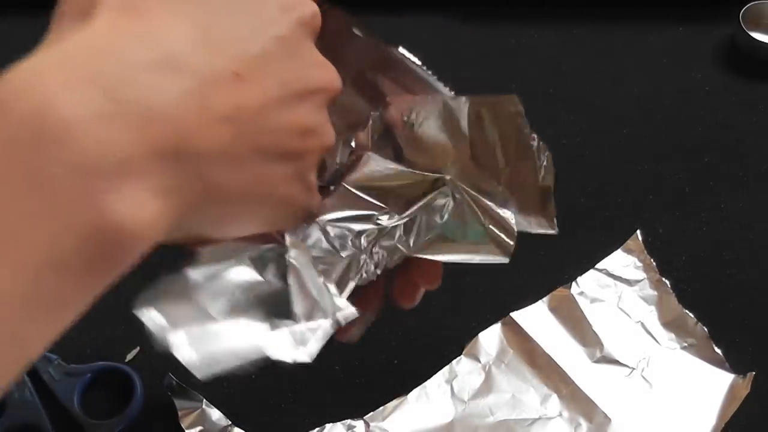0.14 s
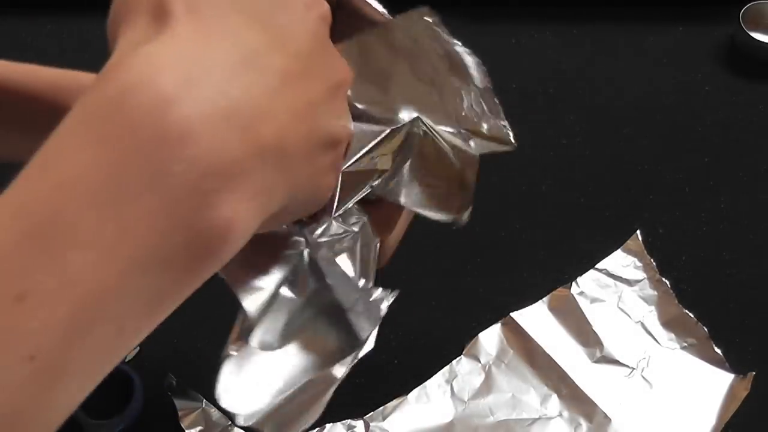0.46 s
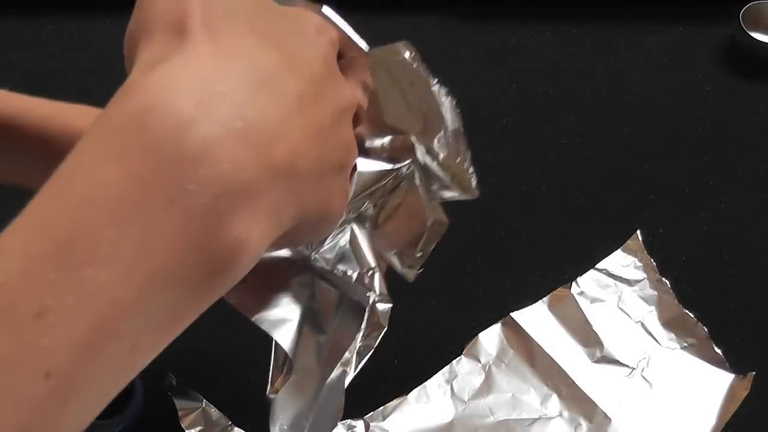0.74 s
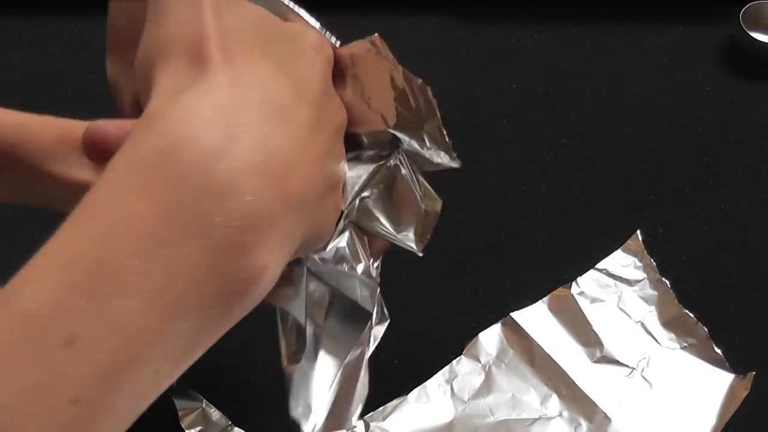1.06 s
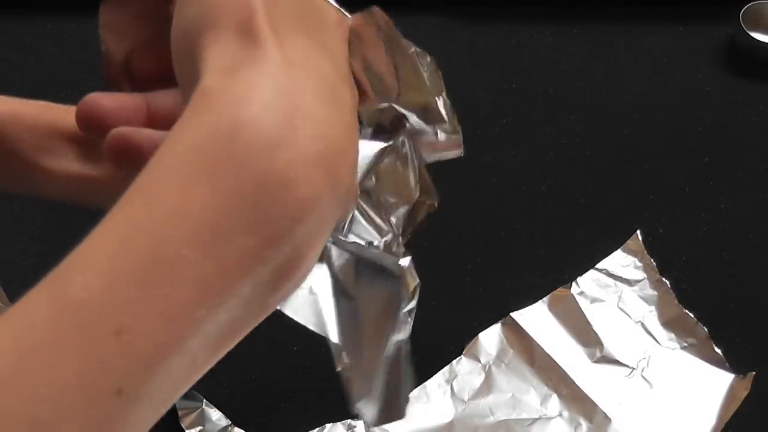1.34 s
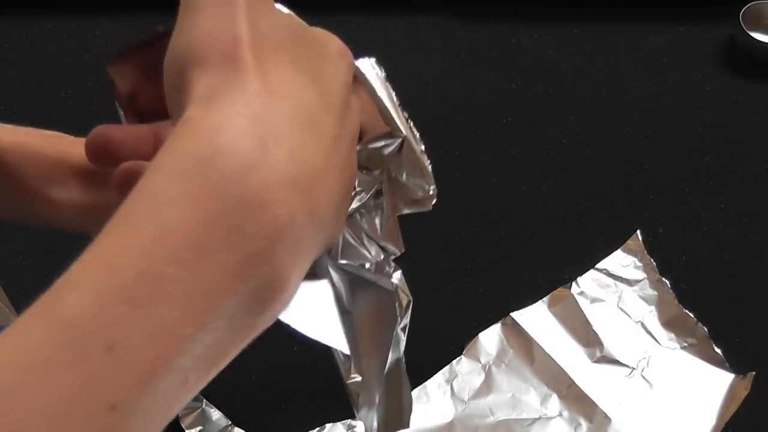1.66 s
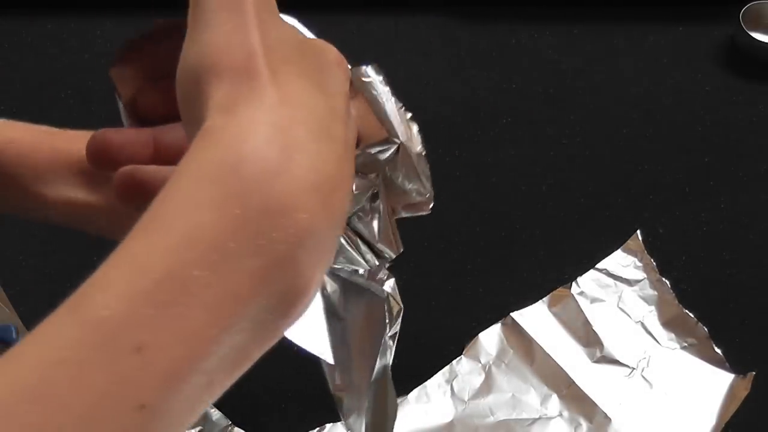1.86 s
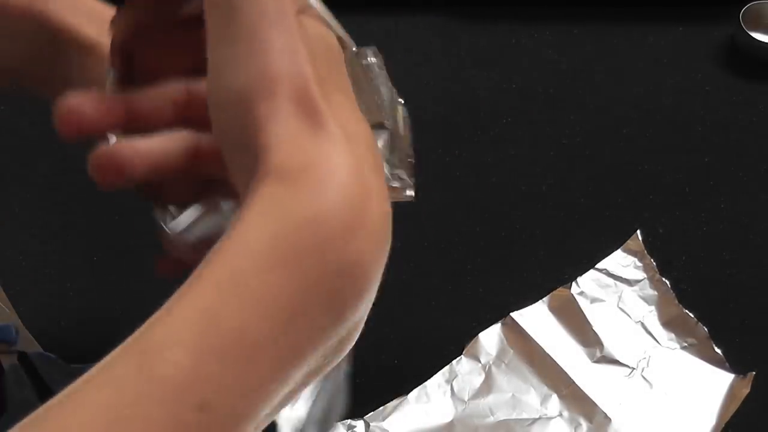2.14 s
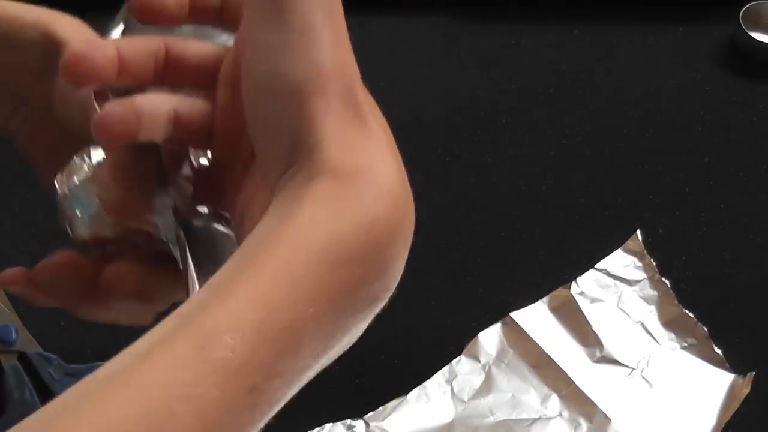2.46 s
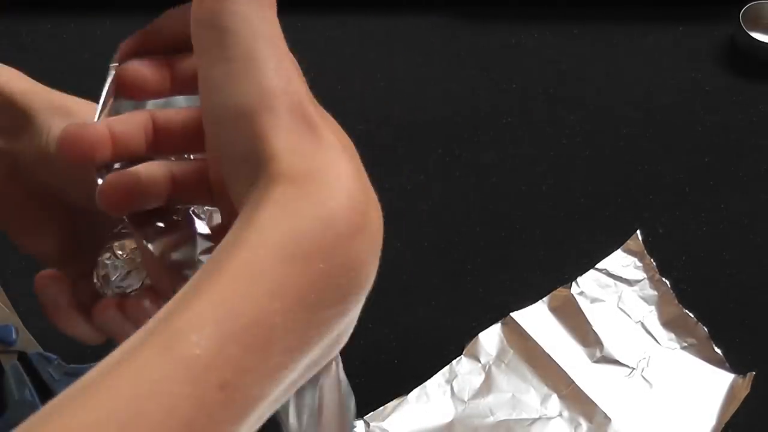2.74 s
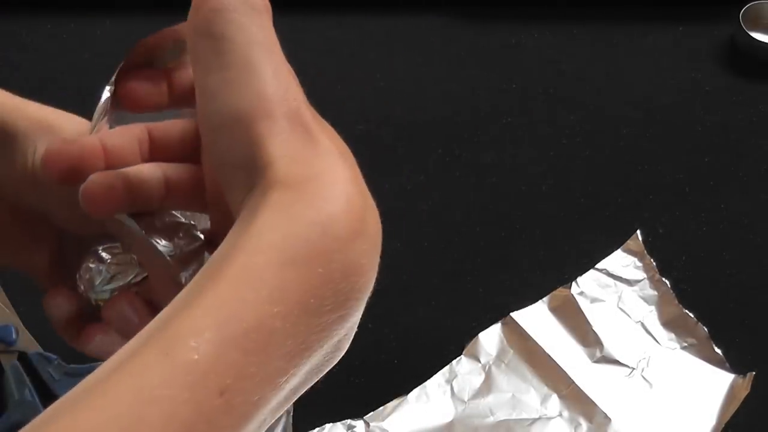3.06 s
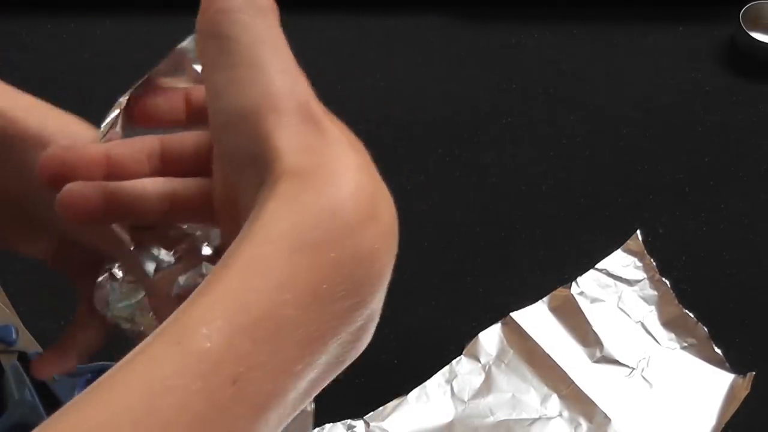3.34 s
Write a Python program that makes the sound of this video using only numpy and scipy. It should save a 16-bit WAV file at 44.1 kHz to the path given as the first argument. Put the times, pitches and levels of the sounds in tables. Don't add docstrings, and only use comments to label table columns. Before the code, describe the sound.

Thin metal foil is crumpled and pressed by two hands over a table, giving continuous bright crackles and irregular sharp snaps, recorded close in stereo in a small quiet room with a faint hum.

```python
import sys
import numpy as np
from scipy import signal
from scipy.fft import rfft, irfft
from scipy.io import wavfile

SR = 44100
rng = np.random.default_rng(int(sys.argv[2]) if len(sys.argv) > 2 else 0)


def gain_from_db(level_db):
    decades = np.asarray(level_db, float) / 20
    return 10 ** decades


def to_wav(s):
    ch = np.atleast_2d(s).T
    pcm = np.round(np.clip(ch, -1, 1) * 32767)
    wavfile.write(sys.argv[1], SR, pcm.astype(np.int16))


N = 154350

# (frequency [Hz], level per Hz [dB])
ROOM_HUM = [(30, -26), (70, -25), (105, 0), (300, -17), (2500, -11.5)]
# (time [s], push on both [thousandths], push left against right [thousandths])
CAPSULE_JOLTS = [
    (0.2054, -6.5, 83),
    (0.4978, -8, -64),
    (0.549, -17.5, 144),
    (1.417, -36, 29),
    (1.5585, 4, 27),
    (1.6342, -35, 30),
    (1.9434, -29, -83),
    (2.9593, -17.5, 189),
    (3.0589, -9, -6),
    (3.2164, 3.5, -5),
]
# (time [s], level [dB])
HAND_PRESSURE = [(0, -38), (.47, -32.5), (.6, -36), (.75, -35), (.86, -42.5), (1.05, -30.5), (1.18, -41.5),
                 (1.37, -31), (1.6, -42), (1.79, -55), (1.92, -36), (2.07, -40), (2.25, -34), (2.73, -40.5),
                 (2.95, -35.5), (3.14, -45.5), (3.28, -33.5), (3.5, -37)]
# (time [s], level change [dB])
HAND_SURGES = [(.145, 4.5), (0.233, -1.5), (.365, -4), (.75, -3), (0.797, 2.5), (.839, -4), (0.854, 5),
               (.906, -6.5), (1.142, 5.5), (1.222, 8), (1.277, -6.5), (1.433, -0.5), (1.483, -4),
               (1.523, -1.5), (1.602, 7), (1.641, 1), (1.748, -1), (1.857, 8), (1.997, -5.5), (2.065, 3),
               (2.09, -4.5), (2.16, 5), (2.346, -14), (2.524, 5), (2.627, 8), (2.724, -2), (2.744, -6),
               (2.887, 1), (2.906, -9), (3.031, 6.5), (3.266, -0.5), (3.381, -3), (3.427, -4.5), (3.5, -4)]
# (time [s], level [dB], panel pitch [Hz])
HARD_CRACKS = [(0.0989, -14, 6450), (0.2045, -17, 11200), (0.211, -14, 10200), (0.2824, -25, 7300),
               (0.4961, -19, 12800), (0.5952, -24, 8800), (0.6104, -21, 9900), (0.6482, -17, 10300),
               (0.796, -22, 10600), (0.8858, -15, 10600), (1.0805, -24, 9000), (1.1257, -17, 10900),
               (1.1965, -21, 6150), (1.2291, -17, 10500), (1.3403, -14, 13100), (1.3476, -21, 3760),
               (1.415, -14, 10500), (1.5583, -13, 10100), (1.5978, -23, 12100), (1.6333, -15, 11600),
               (1.6545, -24.5, 6150), (1.7215, -38, 11000), (1.7397, -28, 10900), (1.885, -23, 12300),
               (1.896, -19.5, 3920), (1.9422, -15.5, 4270), (2.2615, -24, 9500), (2.498, -19, 7100),
               (2.564, -20, 5150), (2.777, -23, 7500), (2.857, -18, 8700), (2.8918, -12, 10800),
               (2.941, -22, 3720), (2.959, -12, 8300), (3.0444, -14, 10300), (3.0576, -13, 8600),
               (3.0744, -31, 8300), (3.1238, -22, 8200), (3.1723, -18, 11000), (3.2162, -20, 10800),
               (3.2363, -28, 11100), (3.271, -16, 11200)]
# (time [s], level [dB], panel pitch [Hz])
PANEL_POPS = [
    (.3305, -21, 1700),
    (.332, -22, 3700),
    (.619, -25, 4100),
    (.679, -24, 3220),
    (.737, -22, 3740),
    (1.255, -23, 3720),
    (1.681, -27, 2460),
    (1.824, -31.5, 2850),
    (1.9422, -22, 1200),
]
# (time [s], peak level [dB], low flap against peak [dB], avalanche
# length [ms])
BUCKLING_CREASES = [(0.0014, -11.5, -21.5, 9.4), (0.0483, -21, -11, 9.8), (0.0594, -10.5, -16.5, 8),
                    (0.0989, -10, -21.5, 4.8), (0.1351, -15.5, -18, 13.5), (0.1544, -13, -22.5, 23),
                    (0.176, -11.5, -21, 11), (0.2027, -7, -18, 5.3), (0.2335, -6, -22, 4.9),
                    (0.2834, -14, -18, 14), (0.3303, -14, -14, 12), (0.4067, -26, -6.5, 6.4),
                    (0.4357, -19.5, -35, 63), (0.4634, -8.5, -16.5, 15.3), (0.494, -11, -50, 9.3),
                    (0.5448, -9.5, -32, 14.5), (0.609, -11, -37, 4.3), (0.63, -21, -26, 8),
                    (0.6472, -15.5, -31, 8.4), (0.6629, -12.5, -26, 8), (0.679, -18, -28, 9.9),
                    (0.696, -10.5, -23.5, 13), (0.7165, -11.5, -29, 8.5), (0.7354, -18, -39, 5),
                    (0.8017, -9, -26, 7.4), (0.8818, -7, -36, 5.3), (0.921, -17, -25, 16),
                    (0.9698, -13.5, -23, 5.6), (0.9885, -13.5, -31, 12), (1.0094, -14, -20, 7.6),
                    (1.0518, -13, -14, 5), (1.0753, -9, -17.5, 6), (1.096, -7.5, -25, 6.3),
                  (1.1246, -16, -34, 5.7), (1.194, -17, -21, 7), (1.2279, -10.5, -18.5, 4.5),
                  (1.2477, -9, -27, 8.8), (1.3013, -14.5, -12, 9.7), (1.3234, -12, -25, 8.1),
                  (1.3475, -7, -28, 2.5), (1.3628, -10.5, -28, 15), (1.3938, -11.5, -21, 9.9),
                  (1.4158, 1.5, -27, 1.1), (1.4312, -29, -26, 5.1), (1.495, -16, -34, 2.9),
                  (1.5311, -13, -32, 17.3), (1.5583, -9.5, -34, 2.5), (1.624, -10, -22.5, 6.1),
                  (1.681, -22.5, -32, 6.7), (1.7, -21.5, -26, 6.3), (1.721, -12, -41, 4.5),
                  (1.7383, -18.5, -27, 4.6), (1.7858, -23.5, -17.5, 3.2), (1.8245, -20, -43, 2.9),
                  (1.8392, -30, -19, 9), (1.8629, -15.5, -30, 18), (1.895, -12.5, -49, 7.6),
                  (1.9207, -13, -27, 22), (1.9426, -2.5, -16, 4.6), (2.014, -13, -20, 6.6),
                    (2.101, -22, -48, 9.5), (2.173, -16.5, -21.5, 15), (2.213, -16, -33, 41),
                (2.2602, -9.5, -39, 7.2), (2.3141, -14, -20.5, 7.1), (2.366, -11, -21.5, 26),
                (2.4412, -19, -21.5, 25), (2.4653, -11, -21.5, 19.6), (2.4903, -9.5, -26, 7.6),
                (2.515, -17, -43, 7), (2.5628, -35, -41, 3.8), (2.643, -17, -22.5, 41),
                (2.68, -10, -29, 10.7), (2.7514, -19.5, -41, 4.2), (2.7743, -17, -45, 5.3),
                (2.7947, -15, -28.5, 20), (2.8409, -20, -48, 14), (2.8908, -16.5, -44, 11),
                (2.937, -14, -19, 10), (2.9597, -11.5, -27, 4), (2.997, -15.5, -27, 22),
                (3.042, -21, -34, 5), (3.057, -16.5, -26.5, 25), (3.122, -20, -30, 4.7),
                (3.171, -14.5, -36, 7.3), (3.2106, -11, -36, 7.9), (3.2334, -21, -9.5, 6.6),
                (3.2682, -20, -31, 8), (3.3986, -12.5, -21, 7.7), (3.4342, -15.5, -9.5, 5.3)]
LARGE_CREASES = BUCKLING_CREASES
# (frequency [Hz], level per Hz [dB])
FOIL_COLOUR = [(150, -17.5), (250, -10.5), (607, -8.5), (2090, -0.5), (2530, 0.5), (3120, 2.5), (5070, 0.5),
               (10900, 2), (16000, -4)]
# (frequency [Hz], width [Hz], depth [dB])
TABLE_ECHO_DIPS = [(2550, 130, -10), (5090, 213, -5)]
# (frequency [Hz], side against mid [dB])
STEREO_WIDTH = [(100, 3), (400, -4), (1000, -12), (2500, -17), (8500, -26), (11500, -7), (16000, -4)]

HUM_DB = -63.5
BOTH_HZ, ACROSS_HZ, JOLT_CYCLES, JOLT_SOFT_HZ, JOLT_DB = 76, 123, 1.46, 610, 36
CASE_CUT_HZ = 41
TICKS_PER_S, TICK_SPREAD_DB, TICK_CYCLES, TICK_PUFF_MS = 1200, 4, 12, .7
TICK_DB, TICK_RAW_DB, RUSTLE_DB = -1, -3.5, 0
CLUMPS_PER_S, CLUMP_DB, RUSTLE_FLICKER_DB = 25, 3.5, 3.5
BRIGHT_HZ, BRIGHT_FOLLOWS = 7000, .5
SURGE_MS = 6.1
HUSH_DB, HUSH_MS = -0.5, 16
HARD_DB, HARD_MS, HARD_RAW_DB = 2, .7, -11
CRACK_CYCLES, POP_CYCLES = 10, 40
SNAP_CLICKS_PER_S, SNAP_SPREAD_DB, SNAP_DB = 4500, 2.8, -12.5
RISE_MS, GRAIN_MS, FIRST_CRACK_MS, FIRST_CRACK_DB = 1.2, .29, 1.27, -5
PANEL_LOW_HZ, PANEL_HIGH_HZ, PANEL_CYCLES, PANEL_DB = 5000, 12900, 11, -8
FLAP_LOW_HZ, FLAP_HIGH_HZ, FLAP_DB = 250, 1400, 13
ROOM_T60_S, ROOM_DB, WALL_HZ = .2, -16, 5000
ACROSS_SHARE, ACROSS_TURN = .5, -1.26


def rms_one(x):
    return x / np.sqrt(np.mean(x ** 2) + 1e-20)


def shaped(x, points, turn=0.):
    hz = np.maximum(np.fft.rfftfreq(N, 1 / SR), 10)
    point_hz, point_db = np.transpose(points)
    gain = gain_from_db(np.interp(np.log(hz), np.log(point_hz), point_db))
    return irfft(rfft(x) * gain * np.exp(1j * turn), N)


def drift(rate):
    r = np.exp(-2 * np.pi * rate / SR)
    noise = rng.standard_normal(N + SR)
    return rms_one(signal.lfilter([1], [1, -2 * r, r * r], noise)[SR:])


def clicks(shape, rate, spread_db):
    size = gain_from_db(spread_db * np.minimum(rng.exponential(1, shape), 3))
    sign = rng.choice([-1, 1], shape)
    return size * sign * (rng.random(shape) < rate / SR)


def puffs(x, ms):
    decay = signal.lfilter([1], [1, -np.exp(-1000 / (ms * SR))], x + 1e-18)
    return decay * rng.standard_normal(x.shape[-1])


def ring(x, hz, cycles):
    r, w = gain_from_db(-60 * hz / (cycles * SR)), 2 * np.pi * hz / SR
    return signal.lfilter([1 - r * r, 0, r * r - 1], [1, -2 * r * np.cos(w), r * r], x + 1e-18)


def room_hum():
    colour = ROOM_HUM + [(16000, -61)]
    return [gain_from_db(HUM_DB + db) * rms_one(shaped(rng.standard_normal(N), colour)) for db in (0, -1.5)]


def capsule_jolts():
    s, both, across = np.transpose(CAPSULE_JOLTS)
    pushes = np.zeros((2, N))
    pushes[:, (s * SR).astype(int)] = gain_from_db(JOLT_DB) * np.array([both, across]) / 1000
    soft = signal.butter(2, JOLT_SOFT_HZ, fs=SR, output="sos")
    swings = []
    for push, hz in zip(pushes, (BOTH_HZ, ACROSS_HZ)):
        swing = ring(push, hz, JOLT_CYCLES) * 100 / hz
        swings.append(signal.sosfilt(soft, swing))
    mid, side = swings
    return mid, signal.lfilter(*signal.butter(1, CASE_CUT_HZ, "high", fs=SR), side)


def hush():
    marks = np.zeros(N)
    times = np.array([row[0] for row in LARGE_CREASES])
    marks[(times * SR).astype(int)] = 1
    approach = signal.lfilter([1], [1, -np.exp(-1000 / (HUSH_MS * SR))], marks[::-1])[::-1]
    return HUSH_DB * np.minimum(approach, 1)


def surges():
    t = np.arange(0, N, 20) / SR
    swell_db = sum(db * np.exp(-.5 * ((t - s) * 1000 / SURGE_MS) ** 2) for s, db in HAND_SURGES)
    return np.interp(np.arange(N) / SR, t, swell_db)


def crackle():
    ticks = clicks(N, TICKS_PER_S * gain_from_db(CLUMP_DB * drift(CLUMPS_PER_S)), TICK_SPREAD_DB)
    ticks = ticks * [np.ones(N), rng.standard_normal(N)]
    panel = rng.integers(0, 24, N)
    ticking = 0
    for k, hz in enumerate(np.geomspace(400, 15000, 24)):
        own = puffs(ticks * (panel == k), TICK_PUFF_MS)
        ticking = ticking + ring(own, hz, TICK_CYCLES) * 3 + gain_from_db(TICK_RAW_DB) * own
    rustle = clicks((2, N), 9000, 2.7) * gain_from_db(RUSTLE_FLICKER_DB * drift(CLUMPS_PER_S))
    both = gain_from_db(TICK_DB) * rms_one(ticking) + gain_from_db(RUSTLE_DB) * rms_one(rustle)
    s, db = np.transpose(HAND_PRESSURE)
    press_db = np.interp(np.arange(N) / SR, s, db) + hush() + surges()
    dull = signal.lfilter(*signal.butter(1, BRIGHT_HZ, fs=SR), both)
    brightness = gain_from_db(BRIGHT_FOLLOWS * (press_db - press_db.mean()))
    return gain_from_db(press_db) * (dull + (both - dull) * brightness)


def cracks_and_pops():
    out = np.zeros((2, N + SR))
    start = np.arange(900) == 0
    for rows, cycles in ((HARD_CRACKS, CRACK_CYCLES), (PANEL_POPS, POP_CYCLES)):
        for s, db, hz in rows:
            puff, place = puffs(start, HARD_MS), rng.standard_normal()
            puff = rms_one(ring(puff, hz, cycles)) + gain_from_db(HARD_RAW_DB) * rms_one(puff)
            puff = gain_from_db(db + HARD_DB) * puff / np.max(np.abs(puff))
            i = int(s * SR)
            out[:, i:i + 900] += puff * [[1], [place]]
    return out[:, :N]


def crease_snaps():
    out = np.zeros((2, N + SR))
    count, length = len(LARGE_CREASES), 4000
    ms_t = np.arange(length) * 1000 / SR
    runs = clicks((count, length), SNAP_CLICKS_PER_S, SNAP_SPREAD_DB)
    places = rng.standard_normal(count)
    pitches = PANEL_LOW_HZ * (PANEL_HIGH_HZ / PANEL_LOW_HZ) ** rng.random(count)
    flap = signal.butter(2, [FLAP_LOW_HZ, FLAP_HIGH_HZ], "band", fs=SR, output="sos")
    for (s, db, low_db, ms), run, place, hz in zip(LARGE_CREASES, runs, places, pitches):
        envelope = np.exp(-ms_t / max(ms, 1)) * (1 - np.exp(-ms_t / RISE_MS))
        run = rms_one(puffs(run, GRAIN_MS)) * envelope
        run = run + gain_from_db(FIRST_CRACK_DB) * puffs(ms_t == 0, FIRST_CRACK_MS)
        panel = gain_from_db(PANEL_DB) * rms_one(ring(run, hz, PANEL_CYCLES))
        low = signal.sosfilt(flap, run)
        new_low = gain_from_db(low_db + FLAP_DB) * rms_one(low)
        snap = run - low + np.std(run) * (panel + new_low)
        i = int(s * SR)
        out[:, i:i + length] += gain_from_db(db + SNAP_DB) * snap * [[1], [place]]
    return out[:, :N]


def foil():
    hz = np.fft.rfftfreq(N, 1 / SR)
    dips_db = sum(db / (1 + (2 * (hz - at) / width) ** 2) for at, width, db in TABLE_ECHO_DIPS)
    sheet = shaped(crease_snaps() + crackle() + cracks_and_pops(), FOIL_COLOUR)
    x = irfft(rfft(sheet) * gain_from_db(dips_db), N)
    tail_s = np.arange(SR // 2) / SR
    tail = rng.standard_normal((2, SR // 2)) * gain_from_db(-60 * tail_s / ROOM_T60_S)
    tail = signal.lfilter(*signal.butter(1, WALL_HZ, fs=SR), tail)
    tail = tail / np.sqrt(np.sum(tail[0] ** 2))
    mid, loose = x + gain_from_db(ROOM_DB) * signal.fftconvolve(x[:1], tail, axes=1)[:, :N]
    tied_side = np.sqrt(ACROSS_SHARE) * shaped(mid, STEREO_WIDTH, ACROSS_TURN)
    loose_side = np.sqrt(1 - ACROSS_SHARE) * shaped(loose, STEREO_WIDTH)
    return mid, tied_side + loose_side


def scene():
    mid, side = np.array(room_hum()) + np.array(capsule_jolts()) + np.array(foil())
    return np.array([mid + side, mid - side])


def band_limit(x):
    return signal.sosfilt(signal.butter(12, 16980, fs=SR, output="sos"), x)


def record(dry):
    top_cut = signal.cheby2(12, 40, 16150, fs=SR, output="sos")
    mix = signal.sosfilt(top_cut, dry)
    return band_limit(mix)


dry = scene()
out = record(dry)
to_wav(out)
```